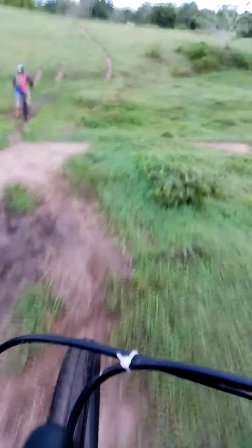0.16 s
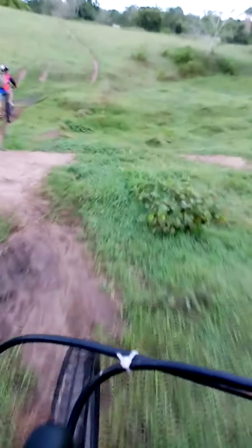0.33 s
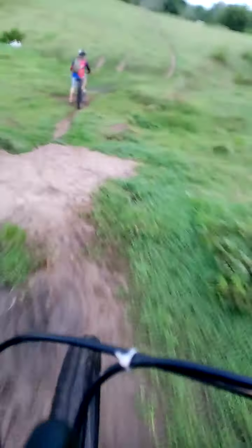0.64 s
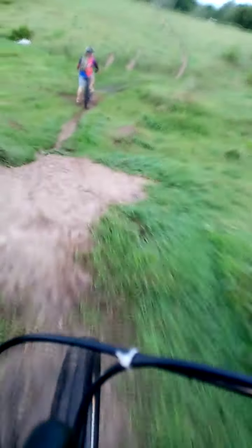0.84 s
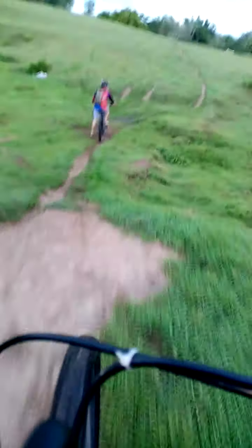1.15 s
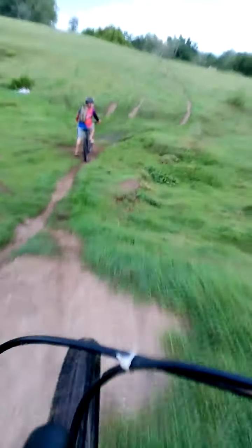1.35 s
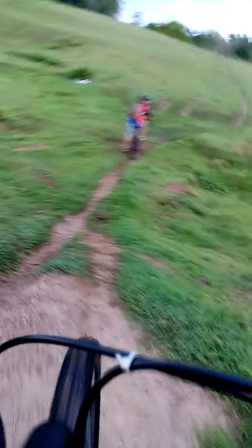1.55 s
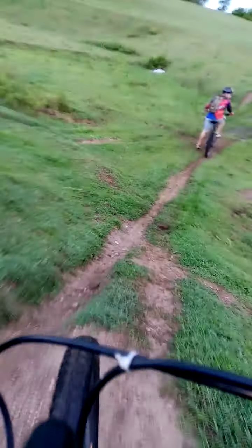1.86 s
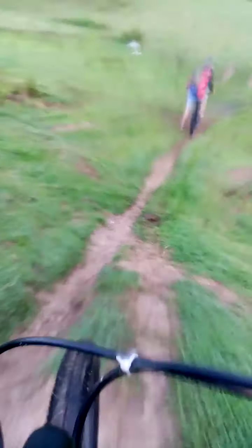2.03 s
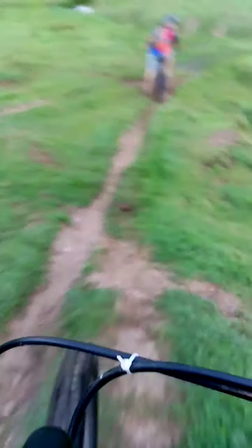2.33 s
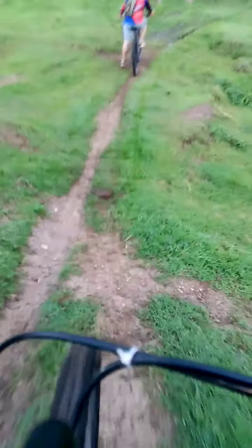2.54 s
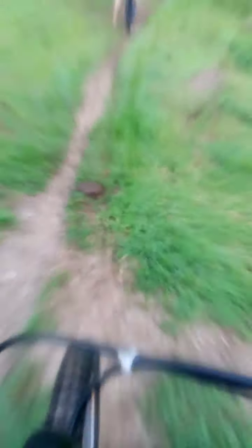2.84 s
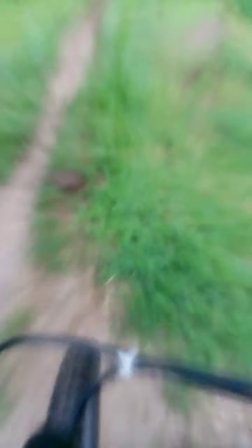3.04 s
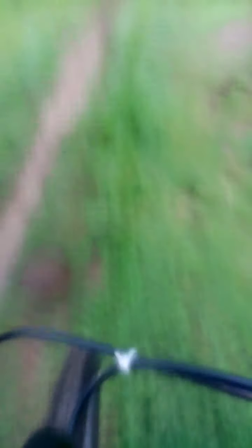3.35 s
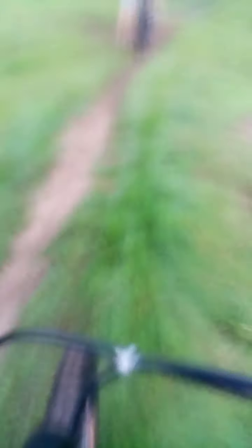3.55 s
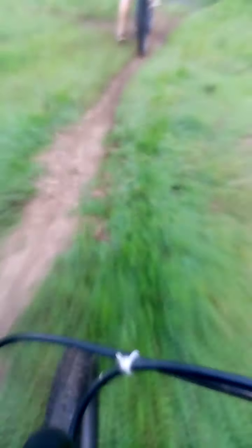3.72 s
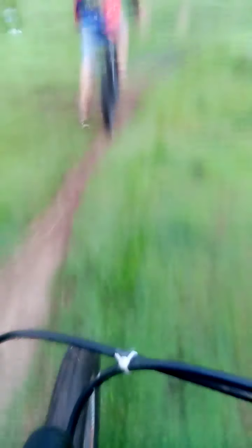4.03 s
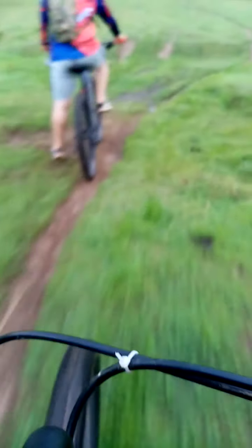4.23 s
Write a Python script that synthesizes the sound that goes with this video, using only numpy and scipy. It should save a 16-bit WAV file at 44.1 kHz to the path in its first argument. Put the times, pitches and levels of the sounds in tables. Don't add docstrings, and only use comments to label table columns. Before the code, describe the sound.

A bicycle rumbles and ticks down a bumpy dirt trail, then its brakes squeal in piercing, stuttering high bursts with frame knocks.

```python
import sys
import numpy as np
from scipy import signal
from scipy.fft import rfft, irfft, next_fast_len
from scipy.io import wavfile
from scipy.ndimage import uniform_filter1d, map_coordinates

SR = 44100
rng = np.random.default_rng(int(sys.argv[2]) if len(sys.argv) > 2 else 0)


def generate_wav(signal):
    frames = np.transpose(np.atleast_2d(signal))
    scaled = np.clip(frames, -1, 1) * 32767
    pcm = np.round(scaled).astype(np.int16)
    wavfile.write(sys.argv[1], SR, pcm)


def to_linear_factor(level_db):
    exponent = np.asarray(level_db, float) / 20
    return 10 ** exponent


N = 193333


def unit(x):
    return x / np.sqrt(np.mean(x ** 2) + 1e-20)


def along(points, hz):
    f, v = np.transpose(points)
    return np.interp(np.log(hz + 1), np.log(f + 1), v)


def curves(rows):
    s, *cols = np.transpose(rows)
    return [np.interp(np.arange(N) / SR, s, c) for c in cols]


def wobble(rate_hz):
    knots = rng.standard_normal(int(N * rate_hz / SR) + 4)
    return map_coordinates(knots, [np.arange(N) * rate_hz / SR])


def filtered(x, response):
    m = next_fast_len(N + 8192)
    return irfft(rfft(x, m) * response(np.fft.rfftfreq(m, 1 / SR)), m)[..., :N]


def shaped(x, points):
    return filtered(x, lambda hz: to_linear_factor(along(points, hz)))


def rush(spectrum, patchy_db, shared=0.24):
    z = signal.stft(rng.standard_normal((2, N)), nperseg=512)[2]
    field = uniform_filter1d(uniform_filter1d(rng.standard_normal(z.shape[1:]), 6, 0), 8, 1)
    z[0] = shared * z[1] + np.sqrt(1 - shared ** 2) * z[0]
    pair = signal.istft(z * to_linear_factor(patchy_db * unit(field)), nperseg=512)[1][:, :N]
    return unit(shaped(pair, spectrum))


def add(track, s, sound):
    k = round(s * SR)
    track[..., k:k + sound.shape[-1]] += sound[..., :N - k]


def muffled(pair):
    # hz, gain_db
    left_port = [(300, 4), (2400, -7.5), (4400, -9), (8000, -13), (11000, -13), (15000, -43.5)]
    return np.array([shaped(pair[0], left_port), pair[1]])


def ruts():
    # start_s, length_s, judder_boost_db, crunch_boost_db
    patches = [(0, 0.05, 9, 8), (0.282, 0.013, 9, 2), (0.433, 0.025, 11.5, 0), (0.526, 0.019, 9.5, -3.5),
               (0.764, 0.015, 10, -1.5), (0.87, 0.075, 6, 6), (1.507, 0.011, 19.5, 11.5),
               (1.593, .04, 8.5, 8), (2.045, 0.026, 4, 2.5), (2.425, .04, 24.5, 2), (2.597, 0.032, 19.5, 3),
               (3.025, 0.097, 10, 13.5), (3.207, 0.063, 5.5, 3.5), (3.313, 0.17, 16.5, 6.5),
               (3.531, 0.05, 12.5, 16), (3.69, 0.068, 9, 0), (3.839, 0.063, 17.5, 12.5),
               (4.0, 0.012, 15, -1.5), (4.072, 0.07, 9, 8)]
    boost = np.zeros((2, N))
    for s, length_s, *boost_db in patches:
        u = np.linspace(0, 1, max(round(1.22 * length_s * SR), 8))
        add(boost, s, np.outer(boost_db, np.clip(12 * u, 0, 1) * np.sqrt(1 - u ** 3)))
    return boost


def bumps():
    # peak_s, peak_db
    bump_events = [(0.158, -27), (0.288, -40), (0.356, -29), (0.435, -28.5), (0.509, -23.5), (0.606, -27.5),
                   (0.763, -24), (0.857, -33), (1.01, -37), (1.179, -59), (1.335, -29), (1.453, -31.5),
                   (1.592, -29.5), (1.646, -41), (1.764, -42.5), (1.765, -35), (1.934, -33.5), (1.937, -28),
                   (2.058, -24), (2.093, -35), (2.27, -26.5), (2.399, -29.5), (2.428, -35), (2.493, -59),
                   (2.584, -25), (2.744, -25.5), (2.843, -32.5), (2.873, -18), (3.019, -34), (3.021, -18),
                   (3.078, -43), (3.209, -24.5), (3.359, -29), (3.417, -19.5), (3.541, -25), (3.647, -27),
                   (3.73, -28), (3.859, -22), (3.996, -43), (4.07, -30), (4.142, -15.5)]
    rise_s, t60_s = .012, .35
    size, t = np.zeros(N), np.arange(SR // 4) / SR
    for s, db in bump_events:
        add(size, max(s - .006, 0), to_linear_factor(db - 10.0 - 60 * t / t60_s) * (1 - np.exp(-t / rise_s)))
    return size


def tyres(duck):
    # time_s, bumpiness_db, grit_db, left_minus_right_db
    trail = [(0.0, -40, -64.5, -7), (0.23, -42.5, -68, -9), (0.55, -46, -66.5, -19.5), (1.15, -40, -66, -4),
             (1.3, -43.5, -65.5, -5), (1.47, -46.5, -66, -15), (1.67, -48, -61.5, -4.5),
             (2.1, -46.5, -59, -14.5), (2.46, -51.5, -64.5, -19.5), (3.0, -36, -60, -9.5),
             (3.57, -31.5, -49.5, 7), (3.74, -26.5, -52, -25.5), (3.83, -40, -56.5, -6),
             (4.13, -35.5, -57, -8.5), (4.38, -37.5, -58, -10)]
    # hz, db_per_hz
    rumble_spectrum = [(15, -64), (25, -46.5), (50, -13), (89, 1), (108, 3), (195, -1.5), (360, -13.5),
                       (790, -93)]
    judder_spectrum = [(200, -40), (300, -0.5), (450, -3), (700, -15), (1100, -20.5), (2000, -62.5)]
    crunch_spectrum = [(400, -25.5), (900, -4), (1200, -6.5), (1700, 0), (2800, -6), (4500, -9),
                       (7000, -16.5), (11000, -61.5)]
    hiss_spectrum = [(3500, -30), (5200, -4), (7000, 0), (8300, -8), (10000, -3), (10900, -9), (11600, -30),
                     (13200, -27), (14700, -9), (15800, -14)]
    spray_spectrum = [(7500, -36.5), (9000, -14.5), (12000, 2), (15500, 2)]
    dusty_from_s = 2.9

    rumble_db, crunch_db, pan_db = curves(trail)
    bumpier_db = rumble_db - rumble_db.mean()
    grittier_db = crunch_db - crunch_db.mean()
    judder_db = -53 + 1.39 * bumpier_db
    hiss_db = -46.5 + 1.08 * grittier_db
    judder_boost_db, crunch_boost_db = ruts()
    bump_size = bumps()

    lumps = to_linear_factor(.6 * wobble(12) + 3 * np.tanh([wobble(30), wobble(30.16)]))
    rumble = unit(lumps * rush(rumble_spectrum, patchy_db=1.5, shared=0))
    rumble = (to_linear_factor(rumble_db - 4.0 + 0.37 * judder_boost_db) + bump_size) * rumble
    swing = to_linear_factor(2.5 * np.tanh(wobble(80)))
    judder = unit(lumps * swing * rush(judder_spectrum, patchy_db=2.5, shared=.3))
    judder = (to_linear_factor(judder_db - 1.0 + judder_boost_db) + to_linear_factor(-32.5) * bump_size) * judder

    grit = to_linear_factor(1.5 * wobble(60) + 2.5 * wobble(300))
    crunch = unit(grit * rush(crunch_spectrum, patchy_db=2.5))
    crunch = to_linear_factor(crunch_db + 9.5 + crunch_boost_db) * crunch
    hiss = to_linear_factor(hiss_db + .2 * crunch_boost_db) * rush(hiss_spectrum, patchy_db=1.5)
    dusty = np.clip((np.arange(N) / SR - dusty_from_s) * 10, 0, 1)
    spray_size = dusty * to_linear_factor(-54 + 1.3 * grittier_db + .3 * crunch_boost_db)
    hiss = hiss + spray_size * rush(spray_spectrum, patchy_db=1) * [[.1], [1]]

    lows = to_linear_factor(np.array([pan_db, -pan_db]) / 2) * (duck ** 0.51 * rumble + duck ** 1.01 * judder)
    return lows + muffled(duck ** 1.026 * crunch + duck ** 0.69 * hiss)


def freewheel():
    # time_s, teeth_passed
    coasting = [(.035, 0), (.35, 7), (.501, 10), (.736, 15), (.957, 20), (1.11, 24), (1.28, 28), (1.4, 31),
                (1.499, 33), (1.964, 41), (2.171, 44), (2.355, 47), (2.567, 51), (2.747, 55), (2.982, 61),
                (3.269, 68), (3.938, 82), (4.368, 90)]
    # centre_hz, width_hz, level_db
    hub_modes = [(5160, 340, 0), (6450, 640, 10), (8170, 730, -1.5), (15050, 2650, 2)]
    blows, t = np.zeros((2, N)), np.arange(900) / SR
    when, passed = np.transpose(coasting)
    teeth_s = np.interp(np.arange(passed[-1]), passed, when)
    chance = rng.random((len(teeth_s), 6))
    for s, (a, b, whole, *pawls) in zip(teeth_s, chance):
        lags_s = (0, 0.003 + 0.0016 * a, 0.0041 + 0.0056 * b)
        for lag_s, z in zip(lags_s, pawls):
            spread_db = 12 * whole + 5 * z
            shape = to_linear_factor(-22.0 - spread_db - 60 * t / 0.02) * (1 - np.exp(-t / 0.00095))
            common = 0.39 * rng.standard_normal(len(t))
            add(blows, s - .002 + lag_s, shape * (common + 0.99 * rng.standard_normal((2, len(t)))))

    def shell(f):
        total = 0
        for k, (c, w, db) in enumerate(hub_modes):
            total = total + (-1) ** k * to_linear_factor(db / 2) * 1j * f * w / (c * c - f * f + 1j * f * w)
        return total

    return muffled(filtered(blows, lambda f: shell(f) ** 2 + 0.31 * (f > 1500) * (f < 11130)))


def scuff():
    # start_s, length_s, level_db
    s, length_s, db = (.872, .09, -49)
    # hz, db_per_hz
    tuft = [(900, -40), (1500, -1), (1900, 4.5), (2600, -19), (3500, -33)]
    out, k = np.zeros((2, N)), round(length_s * SR)
    size = to_linear_factor(db + 2.6 * wobble(90)[:k]) * signal.windows.tukey(k, .4)
    add(out, s, size * rush(tuft, patchy_db=2)[:, :k] * [[.6], [1]])
    return out


def brake_mode(grabs, flutter_hz, wander_hz, climb, drag, bites=()):
    sag, easy_size, glide_s = -.0008, .12, .003
    centre_s, length_s, top_db, grab_hz = np.transpose(grabs)[:, :, None]
    t = np.arange(0, N + 32, 32) / SR
    u = (t - centre_s) / length_s
    swells = to_linear_factor(top_db) * np.cos(np.pi * np.clip(u, -.5, .5)) ** 2
    pull = swells + 1e-4 / (1 + u ** 4)
    grab_hz = grab_hz * (1 + climb * to_linear_factor(top_db) * np.clip(u, -.5, .5))

    def full(x):
        return np.interp(np.arange(N) / SR, t, x)

    size = full(swells.sum(0))
    pitch_hz = full((pull * grab_hz).sum(0) / pull.sum(0))
    pitch_hz = uniform_filter1d(pitch_hz, round(glide_s * SR)) * (1 + sag * (size - easy_size))
    for s, bite_s, depth_hz in bites:
        add(pitch_hz, s, -depth_hz * np.hanning(round(bite_s * SR)))
    linger = signal.lfilter([.001], [1, -.999], np.minimum(size, .05))
    size = size + drag * linger * to_linear_factor(5 * wobble(60))
    pitch_hz = pitch_hz + wander_hz * wobble(35) + flutter_hz * (wobble(100) + 1.1 * wobble(450))
    size = size * to_linear_factor(.5 * wobble(130) + 1.0 * wobble(300))
    return size * np.exp(2j * np.pi * np.cumsum(pitch_hz) / SR)


def overload(tone):
    # start_s, length_s, level_db
    overloads = [(2.017, 0.0029, -34), (2.048, 0.0098, -28), (2.372, 0.004, -31.5), (2.382, 0.0039, -40),
                 (2.434, 0.025, -29.5), (2.636, 0.018, -35.5), (2.753, 0.0047, -32), (2.811, 0.0048, -42.5),
                 (2.961, 0.016, -29.5), (3.074, 0.039, -28.5), (3.323, 0.02, -28)]
    up, down = 160, 147
    gate = np.zeros(N)
    for s, length_s, db in overloads:
        add(gate, s, to_linear_factor(db) * signal.windows.tukey(max(round(length_s * SR), 8), .4))
    level_tone = tone.real / uniform_filter1d(np.abs(tone) + 1e-4, 200)
    fast = signal.resample_poly(level_tone, up, down)
    cut = signal.resample_poly(np.clip(fast - .85, 0, None), down, up)[:N]
    folded = filtered(cut * (gate > 0), lambda hz: (hz > 1100) * (hz < 6300) + 0.21 * (hz > 11000))
    return gate * folded / np.sqrt(np.abs(uniform_filter1d(folded ** 2, 300)) + 1e-9)


def brakes():
    # centre_s, length_s, top_db, pitch_hz
    low_mode_grabs = [(1.506, 0.017, -14.0, 7090), (1.523, 0.033, -12.0, 7123), (1.548, 0.024, -17.5, 7160),
                      (1.554, 0.095, -10.0, 7207), (1.596, 0.019, -20.0, 7220), (1.616, 0.086, -15.0, 7023),
                      (1.633, 0.032, -15.0, 6760), (1.654, 0.022, -19.0, 6829), (1.655, 0.025, -21.5, 6923),
                      (1.657, 0.046, -24.0, 6987), (1.67, 0.022, -8.5, 7204), (1.695, 0.018, -11.0, 7230),
                      (1.702, 0.092, -12.0, 7181), (1.721, 0.027, -12.0, 7264), (1.743, 0.018, -33.5, 7176),
                      (1.759, 0.023, -27.0, 7178), (1.791, 0.058, -41.5, 6963), (1.83, 0.05, -13.5, 7010),
                      (1.835, 0.015, -16.5, 6984), (1.858, 0.038, -5.0, 7228), (1.885, 0.038, -7.5, 7283),
                      (1.907, 0.047, -7.5, 7299), (1.92, 0.031, -26.5, 7429), (1.933, 0.031, -32.0, 7373),
                      (1.939, 0.109, -30.5, 7296),
                      (2.039, 0.058, -23.0, 7313), (2.061, 0.03, -24.5, 7321), (2.081, 0.075, -21.0, 7407),
                 (2.099, 0.037, -14.5, 7373), (2.132, 0.047, -34.0, 7326), (2.174, 0.034, -27.0, 7259),
                 (2.206, 0.039, -15.0, 7234), (2.216, 0.095, -10.5, 7315), (2.251, 0.036, -17.0, 7417),
                 (2.26, 0.03, -30.5, 7398), (2.261, 0.019, -20.0, 7387), (2.274, 0.023, -24.5, 7408),
                 (2.289, 0.042, -20.5, 7476), (2.299, 0.022, -25.5, 7481), (2.321, 0.088, -44.0, 7281),
                 (2.637, 0.092, -28.5, 7312), (2.651, 0.053, -17.5, 7383), (2.667, 0.023, -24.5, 7461),
                 (2.691, 0.063, -21.5, 7512), (2.742, 0.043, -34.0, 7433), (2.788, 0.098, -38.5, 7355),
                 (2.819, 0.028, -34.5, 7399), (2.841, 0.11, -34.5, 7382), (2.847, 0.016, -38.0, 7550),
                 (2.952, 0.037, -39.0, 7319),
                      (3.234, 0.027, -20.0, 7396), (3.25, 0.025, -10.0, 7483), (3.257, 0.109, -22.0, 7395),
                (3.364, 0.021, -32.0, 7127), (3.411, 0.082, -20.0, 7352), (3.432, 0.015, -24.0, 6751),
                (3.451, 0.01, -19.0, 6909), (3.474, 0.051, -27.0, 7370), (3.478, 0.015, -20.0, 7417),
                (3.487, 0.019, -5.0, 7401), (3.518, 0.076, -10.0, 7379), (3.521, 0.01, -12.0, 7381),
                (3.523, 0.028, -22.0, 7458), (3.554, 0.023, -17.0, 7351), (3.571, 0.019, -16.0, 7124),
                (3.577, 0.059, -10.0, 7188), (3.593, 0.021, -13.0, 7287), (3.608, 0.016, -10.5, 7351),
                (3.62, 0.025, -15.5, 7403), (3.661, 0.016, -15.0, 7394), (3.661, 0.105, -22.5, 7344),
                (3.685, 0.041, -18.0, 7202), (3.687, 0.031, -8.0, 7220), (3.703, 0.022, -21.0, 7286),
                (3.711, 0.015, -14.5, 7399), (3.738, 0.022, -14.0, 7140), (3.753, 0.109, -10.0, 7215),
                (3.759, 0.02, -20.5, 7030), (3.767, 0.044, -19.0, 7038), (3.794, 0.055, -12.0, 7394),
                      (3.826, 0.055, -22.5, 7353), (3.855, 0.019, -23.5, 7349), (3.884, 0.083, -21.0, 7312),
               (3.891, 0.024, -15.5, 7454), (3.908, 0.022, -7.5, 7371), (3.925, 0.013, -17.5, 7511),
               (3.935, 0.057, -6.0, 7206), (3.973, 0.052, -11.5, 7352), (3.978, 0.016, -18.0, 7590),
               (4.005, 0.085, -16.5, 7428), (4.011, 0.015, -12.5, 7192), (4.027, 0.074, -24.0, 6924),
               (4.029, 0.028, -23.5, 6991), (4.042, 0.029, -22.0, 7066), (4.044, 0.023, -15.5, 7235),
               (4.044, 0.023, -28.5, 7184), (4.058, 0.04, -35.5, 7254), (4.07, 0.056, -21.5, 7375),
               (4.076, 0.017, -19.0, 7425), (4.087, 0.101, -39.0, 7254), (4.135, 0.014, -23.5, 7144),
               (4.153, 0.099, -31.5, 7114), (4.188, 0.065, -24.5, 7269), (4.192, 0.026, -12.5, 7148),
               (4.209, 0.025, -20.5, 6646), (4.229, 0.102, -29.5, 7034)]
    high_grabs = [(2.016, 0.087, -11.0, 8707), (2.054, 0.034, -10.0, 8685), (2.068, 0.085, -31.0, 8741),
                  (2.128, 0.029, -20.5, 8757), (2.153, 0.04, -29.0, 8691), (2.259, 0.023, -35.5, 8732),
                  (2.331, 0.042, -13.5, 8836), (2.349, 0.028, -11.5, 8731), (2.382, 0.081, -9.5, 8739),
                  (2.411, 0.022, -14.5, 8736), (2.429, 0.022, -17.5, 8683), (2.445, 0.063, -8.0, 8642),
                  (2.457, 0.019, -18.0, 8912), (2.493, 0.017, -26.0, 8734), (2.512, 0.03, -33.0, 8769),
                  (2.626, 0.01, -18.5, 8639), (2.63, 0.11, -18.5, 8679), (2.653, 0.029, -17.0, 8804),
                  (2.707, 0.071, -23.0, 8860), (2.715, 0.027, -11.5, 8864), (2.734, 0.017, -15.0, 8800),
                  (2.754, 0.027, -11.0, 8838), (2.781, 0.108, -17.0, 8694), (2.798, 0.015, -17.0, 8451),
                  (2.814, 0.022, -15.5, 8699), (2.829, 0.069, -28.5, 8771), (2.868, 0.055, -21.5, 8870),
                  (2.884, 0.016, -28.5, 8691), (2.907, 0.012, -14.0, 8767), (2.911, 0.047, -20.5, 8709),
                  (2.962, 0.037, -28.5, 8554), (2.968, 0.065, -11.5, 8692), (2.992, 0.027, -30.0, 8844),
                 (3.024, 0.099, -25.5, 8829), (3.064, 0.027, -33.5, 8742), (3.077, 0.026, -31.5, 8916),
                 (3.09, 0.063, -8.5, 8716), (3.106, 0.019, -15.0, 8881), (3.143, 0.075, -21.0, 8798),
                 (3.149, 0.015, -16.5, 8774), (3.167, 0.032, -10.0, 8793), (3.187, 0.033, -12.5, 8708),
                 (3.208, 0.021, -23.0, 8597), (3.234, 0.023, -19.0, 8699), (3.275, 0.053, -19.0, 8826),
                 (3.305, 0.034, -7.0, 8716), (3.331, 0.039, -8.0, 8649), (3.339, 0.021, -27.0, 8852),
                 (3.349, 0.045, -24.0, 8821), (3.373, 0.012, -12.5, 8831), (3.378, 0.065, -15.5, 8711),
                 (3.412, 0.021, -9.0, 8712), (3.432, 0.026, -18.0, 8774), (3.453, 0.033, -24.0, 8791),
                 (3.473, 0.031, -19.0, 8709), (3.502, 0.021, -15.0, 8698), (3.515, 0.109, -37.0, 8583),
                 (3.845, 0.027, -15.5, 8604), (3.872, 0.038, -24.5, 8641), (3.872, 0.012, -15.5, 8678)]
    # start_s, length_s, depth_hz
    bites = [
        (3.077, .022, 85),
        (3.317, .016, 45),
    ]
    # time_s, level_db
    overtone = [(1.5, -2), (1.95, -2), (2.09, -1.5), (2.2, -0.5), (2.65, -3.5), (3.45, -0.5), (3.75, 2),
                (3.97, 1.5), (4.1, 11), (4.19, -5)]
    # hz, db_per_hz
    fizz = [(13600, -50), (14300, -6), (14800, 0), (15300, -8), (15900, -30)]

    low_grabs = low_mode_grabs
    low = brake_mode(low_grabs, flutter_hz=20, wander_hz=6, climb=0, drag=.07)
    high = brake_mode(high_grabs, flutter_hz=12, wander_hz=2, climb=.03, drag=.035, bites=bites)
    overtone_db = curves(overtone)[0]
    octave = low ** 2 / (np.abs(low) + 0.016) ** 0.9
    octave = octave * to_linear_factor(overtone_db + 2.5 * wobble(70)) * np.exp(.6j * wobble(420))

    difference = high * low.conj() / np.sqrt(np.abs(high * low) + 0.0034)
    mixed = to_linear_factor(-28.5 + 5.2 * wobble(130)) * difference
    mixed = mixed + to_linear_factor(7.0) * high ** 2 * low.conj()
    mixed = mixed + to_linear_factor(-3.0) * low ** 2 * high.conj() / (np.abs(low) + 0.23)
    rub = rush([(4000, -40), (6000, -14), (7300, 0), (7900, -14), (8300, -70)], patchy_db=2)
    rub = rub * np.abs(low) * to_linear_factor(-40)

    right = (low + high + to_linear_factor(-12.5) * octave + mixed).real + overload(0.38 * low + high) + rub[1]
    fizz_size = to_linear_factor(-37 + overtone_db + 3 * wobble(90)) * np.abs(low)
    right = right + fizz_size * rush(fizz, patchy_db=2)[1]

    def path(db):
        return to_linear_factor(db + 2.5 * wobble(70)) * np.exp(1.2j * wobble(40))

    left = path(-16.5) * low + path(-15.0) * high + to_linear_factor(-53.5) * octave + to_linear_factor(-18.5) * mixed
    return np.array([left.real + to_linear_factor(-22.0) * rub[0], right]), np.abs(low) + np.abs(high)


def thump(hz, t60_s):
    t = np.arange(3000) / SR
    return np.sin(2 * np.pi * hz * t) * to_linear_factor(-60 * t / t60_s) * (1 - np.exp(-t / 0.00044))


def frame():
    # start_s, peak_db, thump_db, left_minus_right_db
    knocks = [(1.51, -50.5, 11, 13), (2.494, -59, 10, 7), (2.75, -51, 11, -19), (3.3563, -32, -13, 7.5),
              (3.0016, -54, -1, -7.5), (3.0215, -41, 23.5, -11), (3.045, -29.5, 14.5, -1.5),
              (3.0886, -34.5, 21, -3), (3.197, -45.5, 10, 3), (3.2276, -32, 8, -1), (3.3597, -29, 10, -7),
              (3.3631, -32, 14.5, -18.5), (3.41, -25, 10.5, 4), (3.428, -19, -14, -16.5),
              (3.4321, -17, 0, 16), (3.4504, -21.5, 7.5, -13.5), (3.4677, -24.5, -21, 3.5),
              (3.5464, -28, 14, 0.5), (3.5481, -24, 11.5, 10), (3.5551, -21, -1.5, -8),
              (3.6909, -33, -6, -10), (3.8476, -34, -8, -11), (4.0816, -33, 19, 5)]
    # start_s, peak_db, pitch_hz
    thuds = [
        (1.5105, -28, 950),
        (3.6545, -9, 110),
        (3.697, -17, 330),
        (3.7385, -9, 190),
        (3.757, -18, 300),
        (4.005, -18, 260),
        (4.078, -19, 280),
    ]
    # hz, gain_db
    crack_spectrum = [(400, -8.5), (1000, 0.5), (3000, -6.5), (7000, -1), (10000, -8), (15500, -27.5)]
    # reference_s, spacing_s, level_db
    reference_s, spacing_s, stalk_db = (2.869, 0.0075, -40)

    cracks, lows, t = np.zeros((2, N)), np.zeros((2, N)), np.arange(2200) / SR
    rattle = to_linear_factor(-60 * t / .012) + .24 * to_linear_factor(-60 * t / .07)
    for s, db, thump_db, pan_db in knocks:
        side = to_linear_factor([[pan_db / 2 + 0.5], [-pan_db / 2 + 3.0]])
        add(cracks, s, side * to_linear_factor(db + 4.5) * rattle * rng.standard_normal((2, len(t))))
        rings = np.array([thump(hz, t60_s=0.052) for hz in rng.uniform(106, 294, 2)])
        add(lows, s, to_linear_factor(db + thump_db - 3.0) * rings)
    for s, db, hz in thuds:
        add(lows, s, -to_linear_factor([[db - 26], [db]]) * thump(hz, t60_s=7 / hz))
    stalk_side = to_linear_factor([[stalk_db + 13.0], [stalk_db - 22.0]])
    for k in (-3.9, 0, 1, 1.9, 2.8, 3.6, 4.7, 5.9, 7, 8.1):
        flick = to_linear_factor(-60 * t / 0.0021) * rng.standard_normal(len(t))
        add(cracks, reference_s + k * spacing_s, stalk_side * flick)

    cracks = filtered(cracks, lambda hz: to_linear_factor(along(crack_spectrum, hz)) * hz / (hz + 300))
    left = shaped(cracks[0], [(3000, -1.0), (7500, 5.0), (9500, 7.0), (10800, -42.5)])
    lows = filtered(lows, lambda hz: hz ** 2 / (hz ** 2 + 55 ** 2))
    return lows + np.array([left, cracks[1]])


def scene():
    # start_s, length_s, share_kept
    open_treble = [
        (1.572, .075, .6),
        (2.17, .04, .8),
        (3.46, .255, .42),
        (3.875, .03, .9),
        (4.055, .3, 1),
    ]
    treble_hz, starve_size = 8900, .15
    squeal, loudness = brakes()
    duck = 1 / (1 + uniform_filter1d(loudness, 1500) / .09)
    steady = duck ** 0.51 * freewheel() + tyres(duck) + scuff()
    treble = filtered(steady, lambda hz: (hz > treble_hz) * (hz < 1.55 * treble_hz))
    kept = np.zeros(N)
    for s, length_s, share in open_treble:
        add(kept, s, share * signal.windows.tukey(round(length_s * SR), .3))
    starved = 1 - 1 / (1 + (uniform_filter1d(loudness, 2000) / starve_size) ** 4)
    return squeal + frame() + steady - (1 - kept) * starved * treble


def top_cut(x):
    return signal.sosfilt(signal.butter(12, 16250, fs=SR, output="sos"), x)


def record(dry):
    left_lead_samples, top_hz = 21, 15900
    dry = np.array([np.roll(dry[0], -left_lead_samples), dry[1]])
    rounded = dry / (1 + np.abs(dry / .95) ** 6) ** (1 / 6)
    return top_cut(filtered(rounded, lambda hz: hz < top_hz))


dry = scene()
out = record(dry)
generate_wav(out)
```